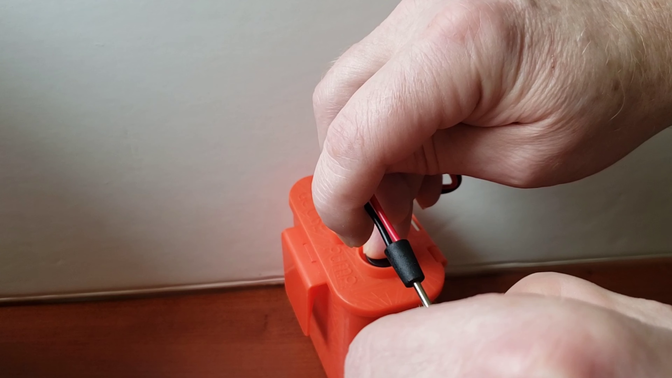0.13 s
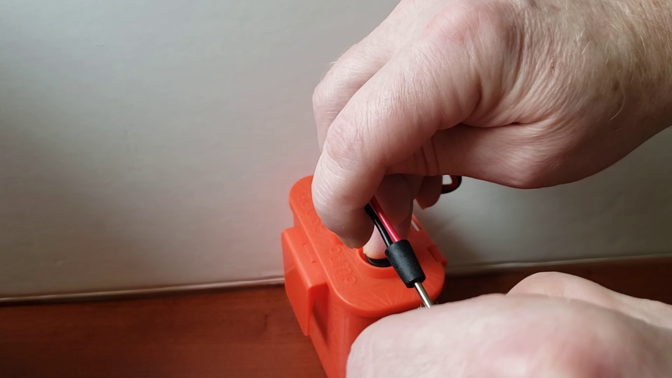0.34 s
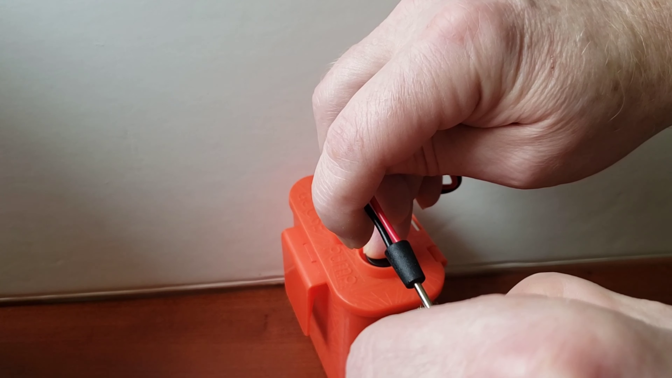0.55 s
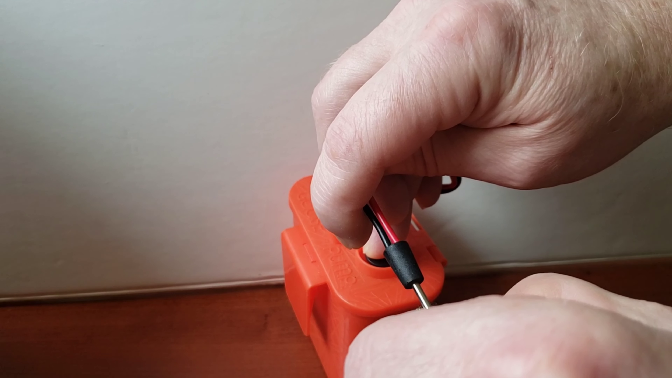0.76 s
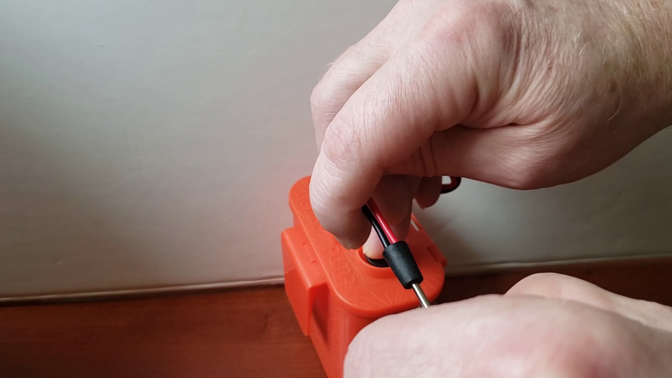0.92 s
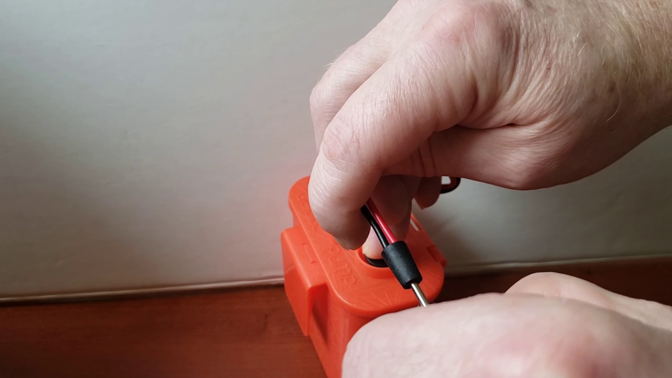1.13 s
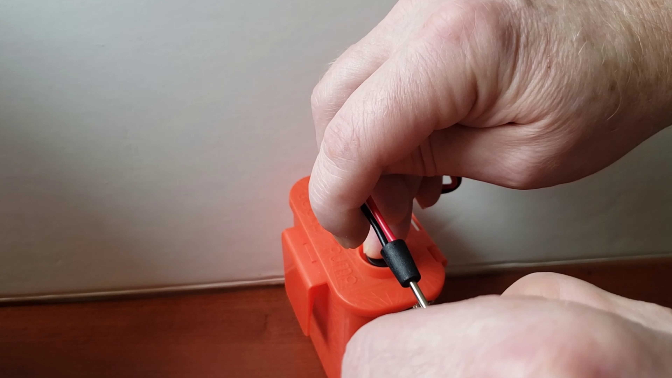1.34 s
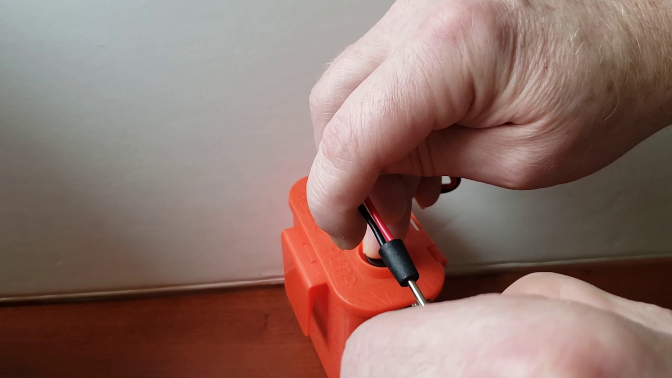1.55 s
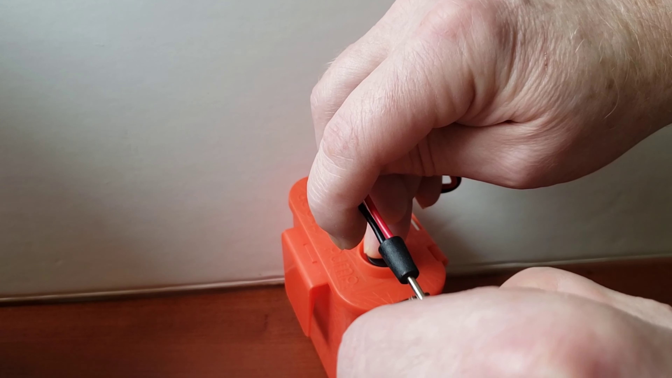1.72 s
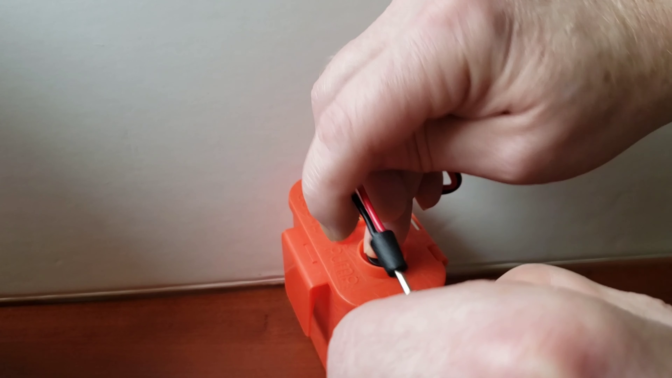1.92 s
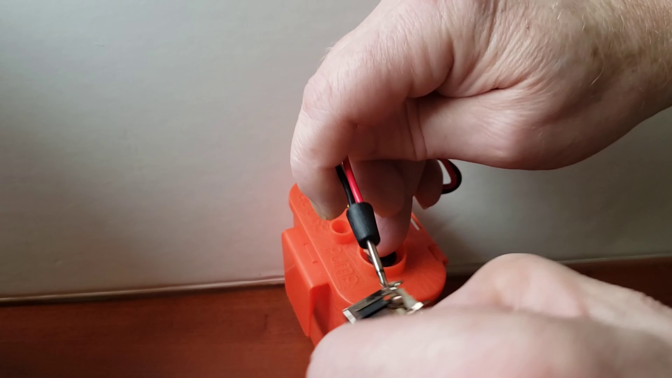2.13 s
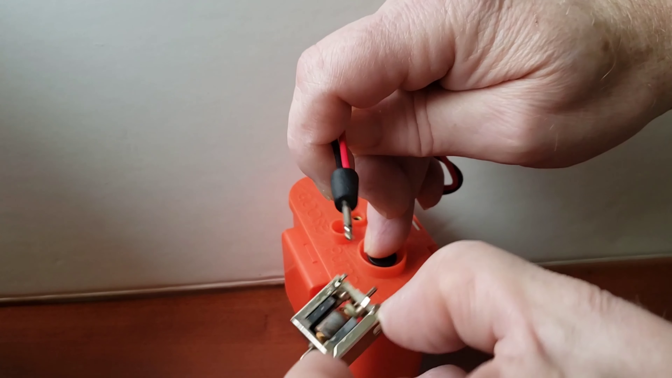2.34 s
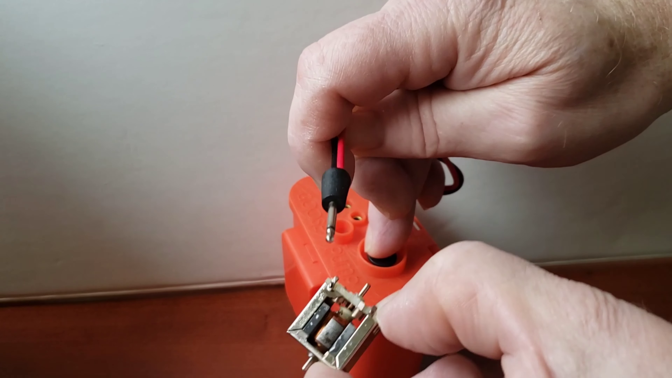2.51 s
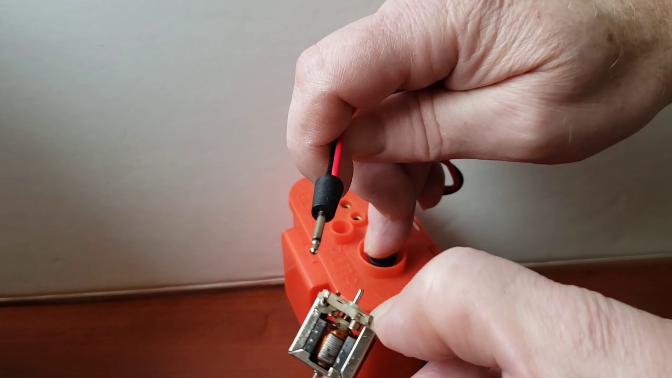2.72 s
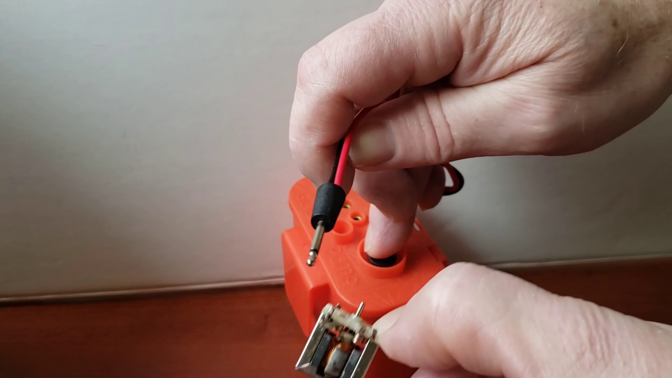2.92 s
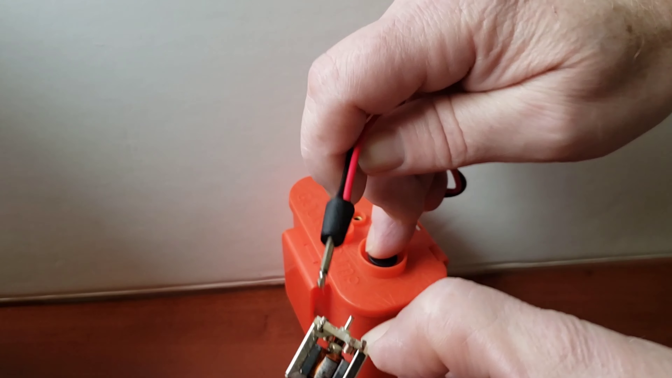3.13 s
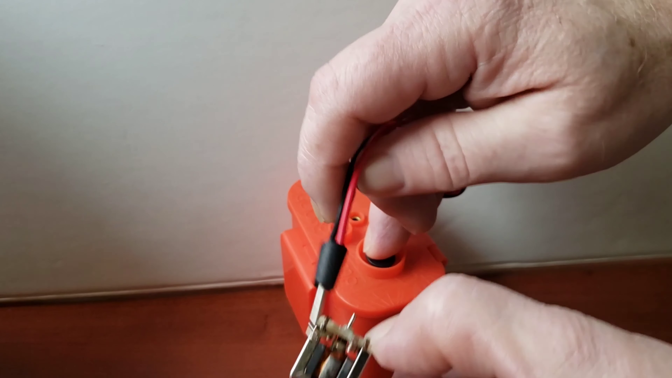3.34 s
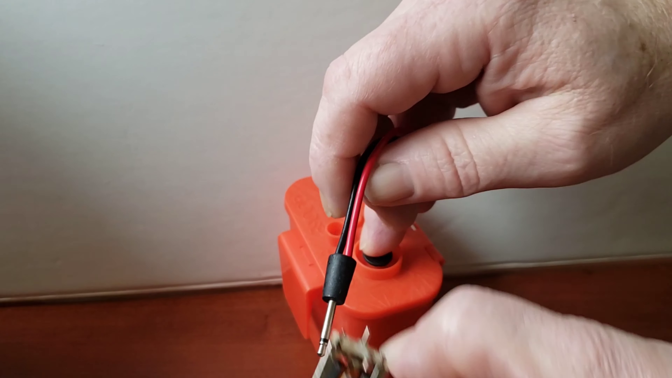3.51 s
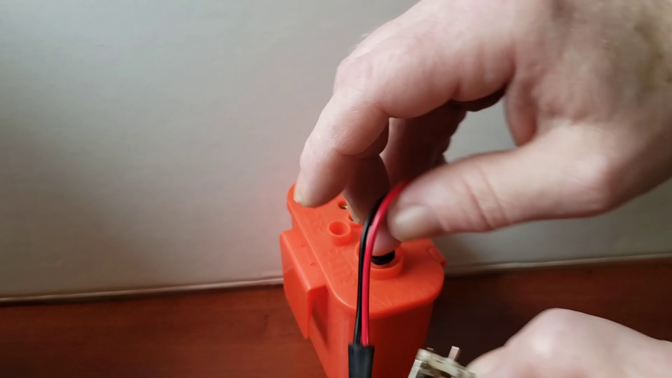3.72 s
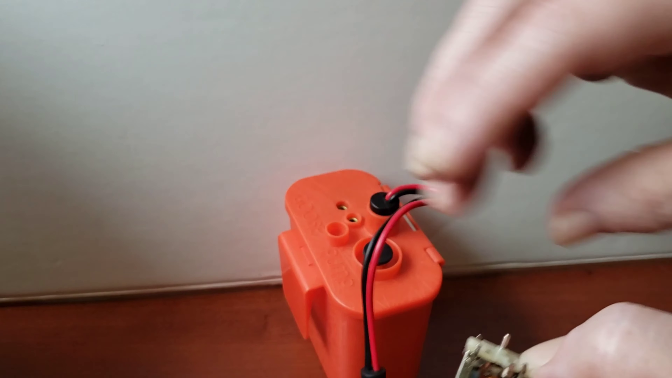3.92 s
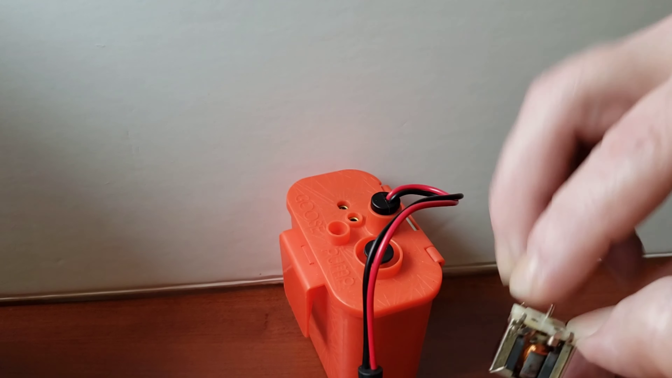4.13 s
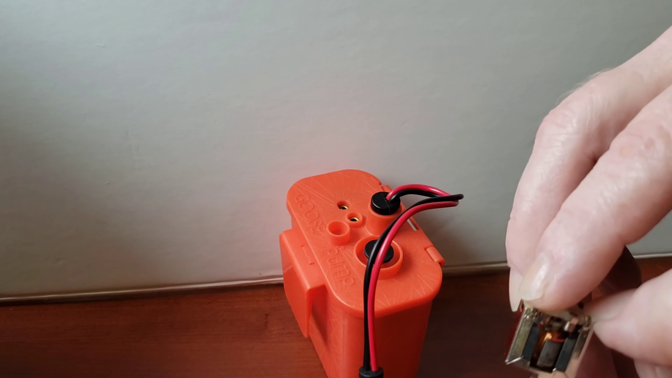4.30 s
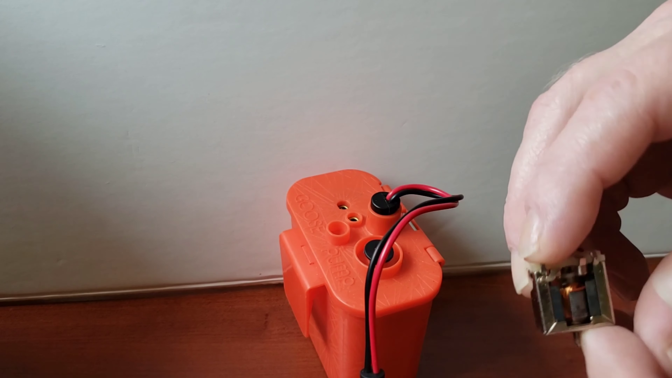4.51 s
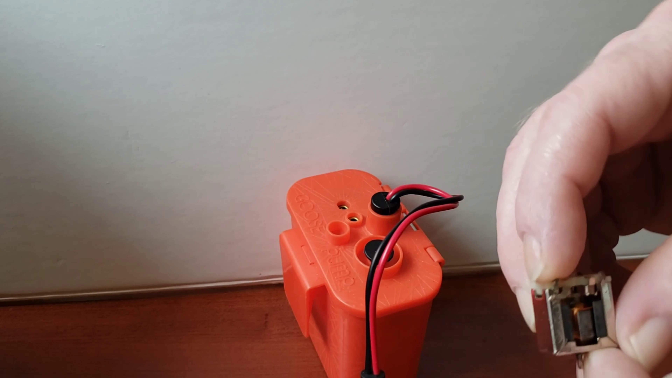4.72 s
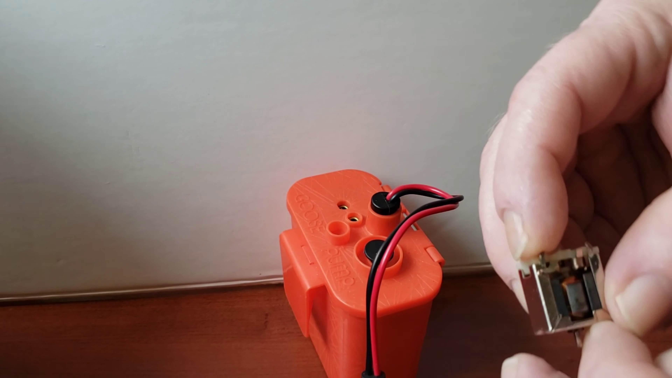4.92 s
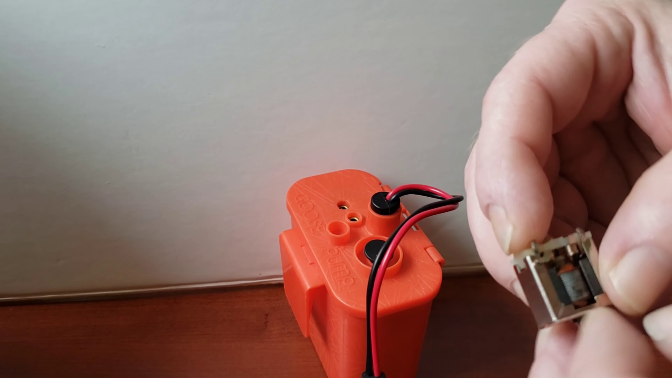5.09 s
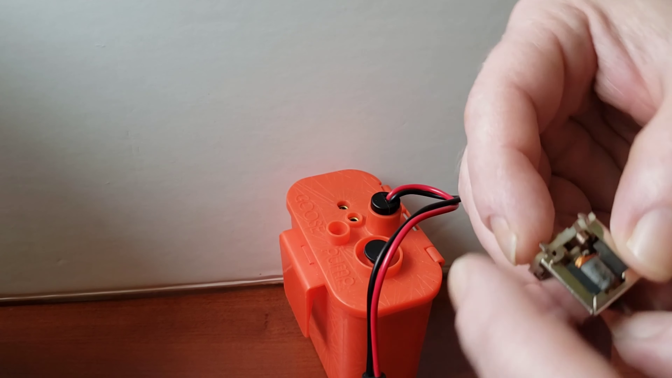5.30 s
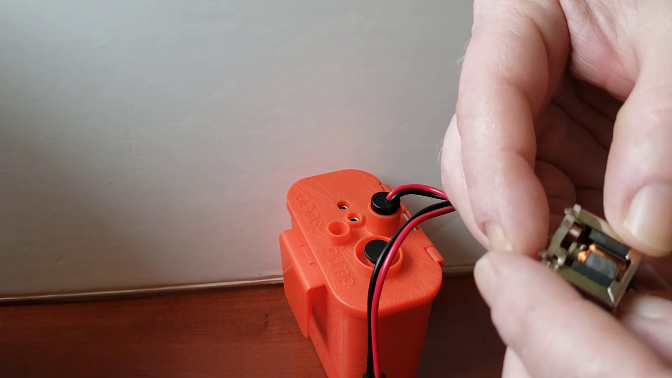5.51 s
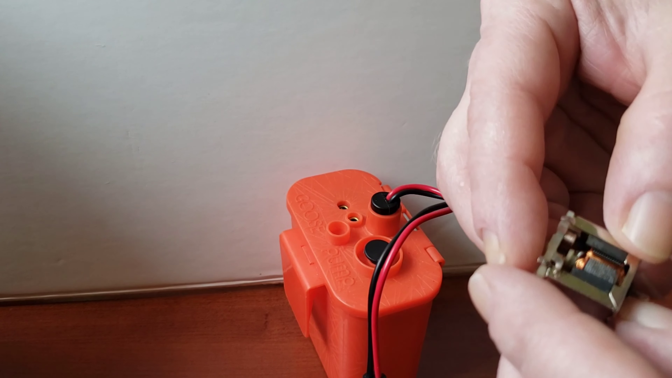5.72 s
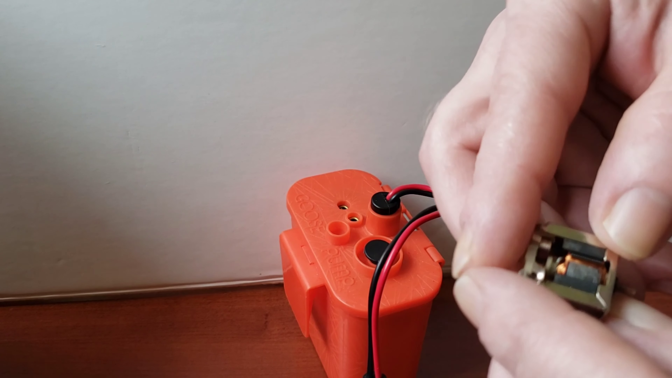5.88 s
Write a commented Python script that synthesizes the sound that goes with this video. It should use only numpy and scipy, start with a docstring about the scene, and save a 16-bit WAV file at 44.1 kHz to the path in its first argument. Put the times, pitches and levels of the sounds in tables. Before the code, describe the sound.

In a quiet room with a low hum, a small battery motor spins up quickly to a thin, scraping whine, holds briefly, then winds down and stops. A short cluster of light knocks on wood follows as a plug and wire touch the bench, mixed with tiny metallic clicks. Soft sounds of fingers sliding over wire and metal finish it. The microphone picks it up far more strongly on the left.

```python
"""A quiet room hums, and almost at once a tiny three-pole motor, touched to a battery lead, whirs to life.
Its brushes scrape the commutator (the spinning contact) and ring the open metal frame; its magnetic
pull ripples and makes a whine. The lead comes off and the motor coasts to rest. The lead knocks on the
wooden bench, and fingers turn the motor over with soft rubs and small metal ticks.
The left channel is far stronger than the right."""
import sys
import numpy as np
from scipy import signal
from scipy.fft import rfft, irfft, next_fast_len
from scipy.io import wavfile
from scipy.ndimage import map_coordinates

SR = 44100
rng = np.random.default_rng(int(sys.argv[2]) if len(sys.argv) > 2 else 0)


def transcribe(signal):
    """Save signal, clipped to [-1, 1], as a 16-bit WAV file at the path in sys.argv[1]."""
    frames = np.atleast_2d(signal).T
    limited = np.clip(frames, -1, 1)
    pcm = np.round(limited * 32767).astype(np.int16)
    wavfile.write(sys.argv[1], SR, pcm)


N = 262395
TIME = np.arange(N) / SR
CONTACT_S, RELEASE_S = .104, 1.759   # the lead touches the motor, then comes off
FULL_SPEED_HZ = 337.9   # turns a second that count as full speed

# Levels in a table compare its rows; the functions set the final loudness.
# brief dips in the hum: (time [s], depth [dB])
HUM_DIPS = [(0.578, 6), (1.19, 6.5), (2.66, 11.5), (4.68, 6.5), (5.15, 7.5)]
# tone of the rumbling room air: (frequency [Hz], level [dB])
RUMBLE_COLOUR = [(15, -77), (25, -21), (40, -10.5), (64, -9), (74, -4.5), (86, -14), (265, -7.5),
                 (423, -18.5), (448, -20), (482, -16), (520, -26.5), (771, -23.5), (1160, -39.5),
                 (1510, -38), (2200, -47), (2860, -100), (4840, -120)]
# tone of the room's faint hiss: (frequency [Hz], level [dB])
HISS_COLOUR = [(1000, -56), (2400, 4), (4400, -5.5), (6800, 8), (8400, -13), (9800, -2), (12000, -5),
               (15500, 0)]
# speed the battery can hold, wandering with the contact: (time [s], speed [turns/s])
POWERED_SPEED = [(0.56, 344), (0.88, 352), (1.37, 340), (1.52, 348.5), (1.73, 352)]
# tone of the brush scrape: (frequency [Hz], level [dB])
SCRAPE_COLOUR = [(400, -15.5), (800, -18.5), (1400, -28.5), (2400, -20.5), (3300, -23.5), (3900, -20.5),
                 (4700, -16), (5700, -16.5), (7400, -10), (8500, -13), (9500, -6), (10900, -0.5),
                 (12000, -1), (15500, 3.5)]
# notes at which the frame and brush springs ring: (frequency [Hz], width [Hz], level [dB])
FRAME_NOTES = [(1600, 200, 3.5), (2450, 100, -22), (4470, 254, 6.5), (5200, 260, -13), (6930, 320, 6),
               (10070, 360, 6.5), (11660, 130, -12), (14180, 140, 13), (15350, 67, -18)]
# knocks: first the tap of the lead touching the motor, then the lead on the bench: (time [s], level [dB])
KNOCKS = [(0.122, -50), (2.189, -50), (2.333, -38), (3.575, -28.5), (3.793, -51.5), (3.819, -29.5),
          (3.834, -36.5), (4.001, -45), (4.041, -38.5), (4.068, -45), (4.171, -37.5), (4.237, -45.5)]
# notes at which the wooden bench rings: (frequency [Hz], level [dB], time to fade by 60 dB [s])
BENCH_NOTES = [(304, -3, 0.037), (422.4, 3, 0.05), (569, -4, 0.052), (681, 5.5, 0.038), (848, -3, 0.024),
               (844, -5, 0.034), (1019, 1.5, 0.029), (1318, -5, 0.033), (1500, -12, 0.0217)]
# tones of the whine: (cycles per turn [count], level at full speed [dB], growth with speed [exponent])
WHINE_TONES = [(1, -56.5, 1.5), (2, -65.5, 2.2), (3, -54, 3.2), (5, -73, 3.4), (6, -61.5, 7.3),
               (7, -67, 5.3), (9, -53.5, 1.3), (10, -67.5, 18), (12, -56.5, 12), (15, -58, 3.5),
               (20, -59, 2.65), (21, -59, 6.8)]
# fingers sliding on wire and metal: (middle time [s], length [s], hiss level [dB], rub level [dB])
SLIDES = [(2.57, 0.28, -58.5, -79), (3.224, .17, -61.5, -68.5), (3.542, 0.074, -65.5, -55.5),
          (3.846, 0.075, -73, -64), (4.12, 0.32, -67, -75), (4.555, 0.058, -76, -65.5),
          (4.653, 0.163, -66.5, -85), (5.384, .25, -70.5, -90), (5.642, 0.055, -68, -74),
          (5.93, 0.073, -70, -75)]
# tone of the fingers' hiss: (frequency [Hz], level [dB])
FINGER_COLOUR = [(2500, -15), (4200, -16.5), (5000, -10), (7000, 1.5), (8400, -23), (9800, -16),
                 (11000, -5), (15000, -2.5)]
# tone of their lower rub: (frequency [Hz], level [dB])
RUB_COLOUR = [(400, -25), (900, 16), (2000, 10.5), (2700, 5), (3600, -3), (8000, -42)]
# metal ticks of plug and motor: (time [s], level [dB], frequency [Hz], width [Hz])
TICKS = [(2.919, -52.5, 6400, 3000), (3.512, -41, 10400, 4500), (3.575, -44.5, 4660, 6000),
         (3.820, -42.5, 4300, 4960), (3.858, -44.5, 5430, 5000), (3.904, -43, 6850, 4000),
         (4.014, -44, 6830, 3500), (4.108, -53, 6200, 4000), (4.519, -59, 2550, 500),
         (4.54, -48.5, 2480, 700), (5.382, -52, 6030, 7040), (5.636, -43, 7700, 9000)]
# how much weaker the right channel is: (frequency [Hz], gain [dB])
RIGHT_COLOUR = [(60, -50), (400, -41), (1300, -32.5), (2400, -31), (4400, -25), (7000, -16), (9500, -21.5),
                (11500, -7.5), (15000, -9)]


def from_db(db):
    """Turn decibels into a number to multiply by."""
    return 10 ** (np.asarray(db) / 20)


def rms_one(x):
    """Scale a signal so its typical size (rms) is 1."""
    return x / np.sqrt(np.mean(x ** 2) + 1e-20)


def colour(x, spectrum):
    """Shape the tone of a sound with a (frequency [Hz], level [dB]) curve."""
    hz, db = np.transpose(spectrum)
    size = next_fast_len(N + SR // 10)
    bin_hz = np.maximum(np.arange(size // 2 + 1) * SR / size, 1)
    gain = from_db(np.interp(np.log(bin_hz), np.log(hz), db))
    return irfft(rfft(x, size) * gain, size)[..., :N]


def noise(spectrum):
    """Noise with the given tone, separate in each channel."""
    return rms_one(colour(rng.standard_normal((2, N)), spectrum))


def drift(rate):
    """A smooth random wobble through `rate` new values a second."""
    return rms_one(map_coordinates(rng.standard_normal(N // 8), [TIME * rate], order=3, mode="wrap"))


def swell(s, length_s):
    """A smooth rise to 1 at time s, and a fall after it."""
    return np.exp(-2 * ((TIME - s) / length_s) ** 2)


def resonance(x, hz, width_hz):
    """Make a sound ring at one pitch; a narrower width rings longer."""
    r = np.exp(-np.pi * width_hz / SR)
    feedback = [1, -2 * r * np.cos(2 * np.pi * hz / SR), r * r]
    return signal.lfilter(np.array([1, 0, -1]) * (1 - r * r) / 2, feedback, x + 1e-18)


def add(track, s, sound):
    """Mix a sound in at time s."""
    start = int(s * SR)
    track[..., start:start + sound.shape[-1]] += sound[..., :N - start]


def room(x, fade_s, echo_db):
    """Add a wash of echoes from the walls that falls by 60 dB in fade_s."""
    t = np.arange(SR // 2) / SR
    tail = rng.standard_normal((2, len(t))) * from_db(-60 * t / fade_s) * (t > .003)
    tail /= np.sqrt(np.sum(tail ** 2, axis=1, keepdims=True))
    return x + from_db(echo_db) * signal.fftconvolve(np.atleast_2d(x), tail, axes=1)[:, :N]


def room_hum(hum_hz=58.8, hum_db=-44, waver_db=2, rumble_db=-46.5, hiss_db=-71):
    """An unsteady low hum over the rumble and hiss of the room."""
    dip_db = sum(depth_db * swell(s, length_s=0.13) for s, depth_db in HUM_DIPS)
    strength = from_db(hum_db - dip_db + waver_db * drift(16))
    hum = strength * np.sqrt(2) * np.sin(2 * np.pi * hum_hz * TIME + 0.32 * drift(8))
    return hum + from_db(rumble_db) * noise(RUMBLE_COLOUR) + from_db(hiss_db) * noise(HISS_COLOUR)


def rotor(spin_up_s=.1, bearing_drag_s=1.15, brush_drag_hz_per_s=338):
    """The battery spins the rotor up, then drag stops it. Gives turns a second and electric current."""
    powered = np.interp(TIME, *np.transpose(POWERED_SPEED))
    run_up = (1 - np.exp(-np.maximum(TIME - CONTACT_S, 0) / spin_up_s)) ** .7   # .7 hardens the kick
    coast = np.exp(-np.maximum(TIME - RELEASE_S, 0) / bearing_drag_s)
    speed = powered * run_up * coast - brush_drag_hz_per_s * bearing_drag_s * (1 - coast)
    current = (1 - run_up) * (TIME > CONTACT_S)   # 1 at first touch, falling as speed builds
    return np.maximum(speed, 0), current


def scrape_strength(speed, current, friction_db=-33, crawl_db=-58, spark_db=-40, crawl_hz=25):
    """Friction grows with speed and sparking with current; a dry scrape lasts until the rotor stops."""
    friction = from_db(friction_db) * (speed / FULL_SPEED_HZ) ** 1.69
    crawl = from_db(crawl_db) * np.tanh(speed / crawl_hz)
    sparks = from_db(spark_db) * current
    touch = np.clip((TIME - CONTACT_S) / 0.023, 0, 1)
    return touch * np.sqrt(friction ** 2 + crawl ** 2 + sparks ** 2)


def brushes(turns, strength, swing_db=1.5, gap_db=1.5, grit_db=2, flutter_db=0.5, boost_db=7):
    """The brushes scrape, pressing harder once a turn and at each of the commutator's three gaps."""
    angle = 2 * np.pi * turns
    pressure_db = swing_db * np.cos(angle) + gap_db * np.cos(3 * angle)
    pressure_db += grit_db * drift(3500) + flutter_db * drift(60.27)
    surface = rng.standard_normal(size=56)   # the same scratches come round on every turn
    position = (turns + 0.018 * drift(150)) * len(surface)
    scratches = map_coordinates(surface, [position], order=3, mode="grid-wrap")
    force = (rng.standard_normal((2, N)) + from_db(-8) * scratches) * from_db(pressure_db)
    return room(from_db(boost_db) * strength * rms_one(frame(force)), fade_s=0.081, echo_db=-3.5)


def frame(force, shift_db=1.5):
    """The brushes ring the metal frame; as the contact shifts, one note or another stands out."""
    scrape = colour(force, SCRAPE_COLOUR)
    return scrape + sum(from_db(db + shift_db * drift(45.14)) * resonance(scrape, hz, width_hz)
                        for hz, width_hz, db in FRAME_NOTES)


def knocks(boost_db=5, vary_db=2.5, clatter_fade_s=0.072, clatter_db=-6):
    """Each knock rings the bench a little differently, with a dull clatter of plastic on wood."""
    out, t = np.zeros(N), np.arange(SR // 3) / SR
    dull = signal.butter(10, 1400, fs=SR, output="sos")
    contact = signal.butter(1, [298, 1600], "band", fs=SR, output="sos")   # pitches a knock stirs up
    for s, peak_db in KNOCKS:
        wood = 0
        for k, (hz, db, fade_s) in enumerate(BENCH_NOTES):
            strength = from_db(db + vary_db * rng.standard_normal() - 60 * t / fade_s)
            wood += (-1) ** k * strength * np.sin(2 * np.pi * hz * t)
        clatter = signal.sosfilt(dull, rng.standard_normal(len(t)) * from_db(-60 * t / clatter_fade_s))
        knock = signal.sosfilt(contact, rms_one(wood) + from_db(clatter_db) * rms_one(clatter))
        add(out, s, from_db(peak_db + boost_db) * knock / np.abs(knock).max())
    return room(out, fade_s=0.37, echo_db=-5.5)


def whine(turns, speed, onset_hz=256, waver_db=2.4, rough_db=2):
    """The pull of three magnetic poles ripples, making tones that rise and grow with speed."""
    angle = 2 * np.pi * (turns + 0.0059 * drift(120))   # the loose shaft shakes a little
    tones = 0
    for multiple, db, growth in WHINE_TONES:
        strength = from_db(db + waver_db * drift(25.92) + rough_db * drift(200))
        strength *= (speed / FULL_SPEED_HZ) ** growth
        tones += strength * np.sin(multiple * angle + rng.uniform(0, 2 * np.pi))
    onset = (speed / onset_hz) ** 14   # the whine dies away below this speed
    return np.sqrt(2) * tones * onset / (1 + onset)


def brush_catches(turns, speed, slow_hz=90, ping_db=-5, squeak_db=-45, squeak_hz=10360):
    """At low speed a brush catches an edge once a turn: its spring pings, and it squeaks in between."""
    edge = np.diff(np.floor(turns), prepend=0)
    pace = speed / slow_hz
    grip = pace / (1 + pace ** 6)   # strongest a little below slow_hz
    flicks = edge * rng.uniform(.5, 1, N) * grip
    spring = resonance(flicks, 8500, 320) + resonance(flicks, 17000, 460)
    pings = from_db(ping_db) * colour(spring, [(6000, -2.5), (9500, -15.0), (14500, -6)])
    thin_hiss = resonance(resonance(rng.standard_normal(N), squeak_hz, 700), squeak_hz, 700)
    squeak = from_db(squeak_db) * rms_one(thin_hiss) * grip / (1 + pace ** 2)
    return room(pings + squeak, fade_s=.15, echo_db=-4)


def motor():
    """One spinning rotor drives the scrape, the whine and the slow pings."""
    speed, current = rotor()
    turns = np.cumsum(speed) / SR
    pings = brush_catches(turns, speed)
    return brushes(turns, scrape_strength(speed, current)) + whine(turns, speed) + pings


def fingers(hiss_boost_db=2):
    """Skin slides over wire and frame: a hiss and a lower rub swell and fade."""
    hiss = sum(from_db(db + hiss_boost_db) * swell(s, length_s) for s, length_s, db, _ in SLIDES)
    rub = sum(from_db(db) * swell(s, length_s) for s, length_s, _, db in SLIDES)
    return hiss * noise(FINGER_COLOUR) + rub * noise(RUB_COLOUR)


def metal_ticks(boost_db=2, fade_s=0.019):
    """Metal touches metal lightly: each tick is a burst of tiny contacts around one pitch."""
    out, t = np.zeros(N), np.arange(SR // 8) / SR
    for s, peak_db, hz, width_hz in TICKS:
        contacts = rng.standard_normal(len(t)) * from_db(-60 * t / fade_s)
        burst = resonance(resonance(contacts, hz, width_hz), hz, width_hz)
        add(out, s, from_db(peak_db + boost_db) * burst / np.abs(burst).max())
    hollow = out - resonance(out, 8480, 4200)
    return room(hollow, fade_s=0.26, echo_db=-1)


def scene():
    """The motor and the sounds of handling it, in a humming room."""
    return motor() + knocks() + metal_ticks() + fingers() + room_hum()


def record(dry, hiss_db=-72, cutoff_hz=15500):
    """The right channel is weak and thin; both get a faint hiss and lose their highest treble."""
    hiss = noise([(60, 17), (600, 8), (2500, 5), (4500, 3.5), (8200, -9.5), (12000, 7), (15000, 0.5)])
    both = np.array([dry[0], colour(dry[1], RIGHT_COLOUR)]) + from_db(hiss_db) * hiss
    return signal.sosfilt(signal.ellip(12, .2, 80, cutoff_hz, fs=SR, output="sos"), both)


dry = scene()
out = record(dry)
transcribe(out)
```